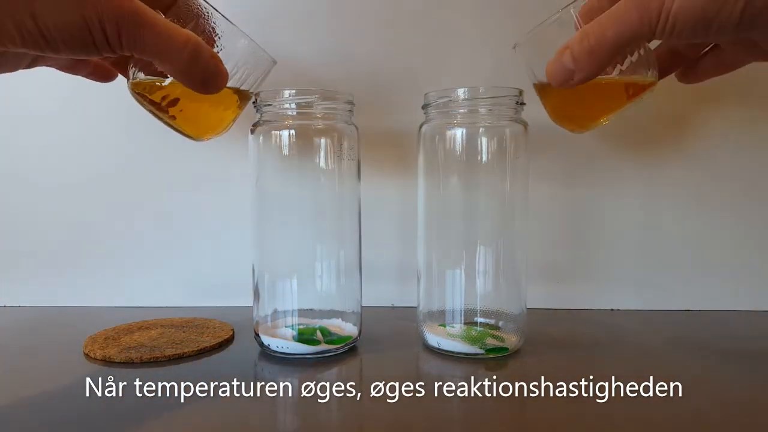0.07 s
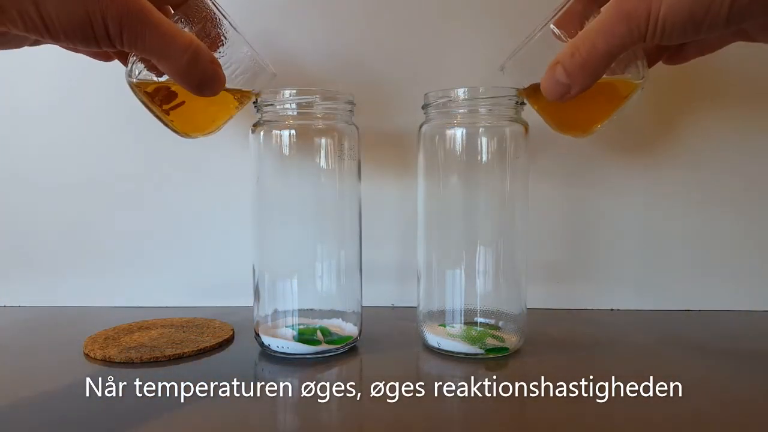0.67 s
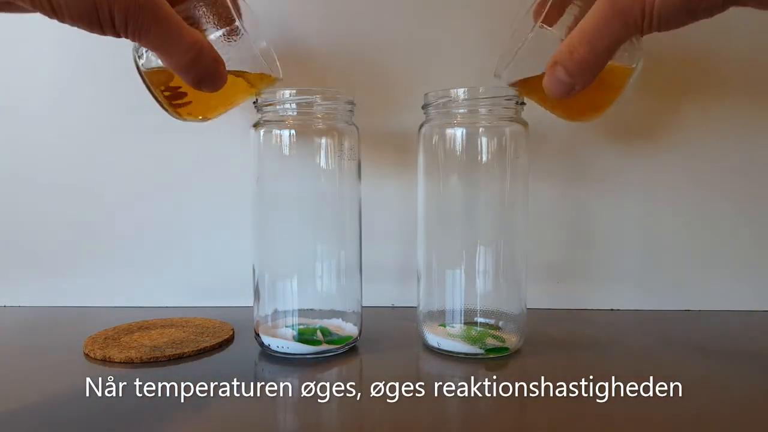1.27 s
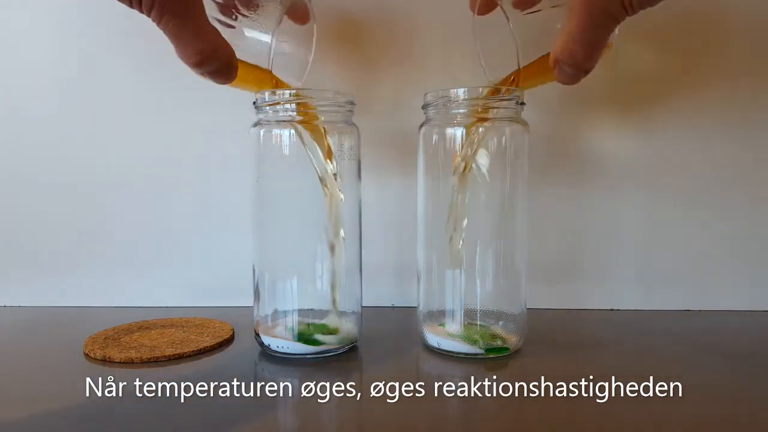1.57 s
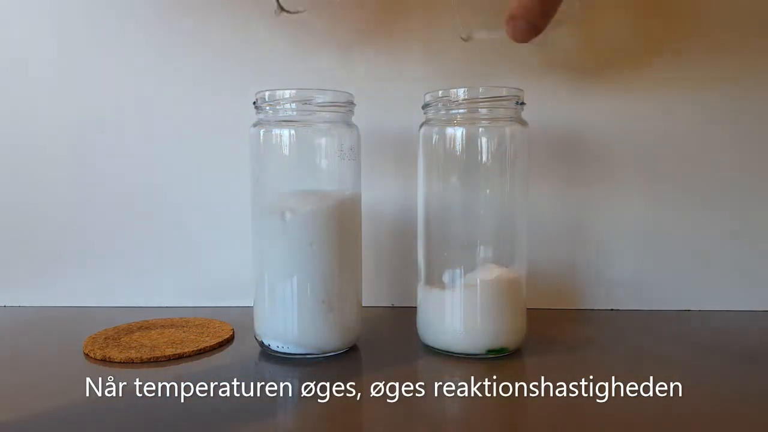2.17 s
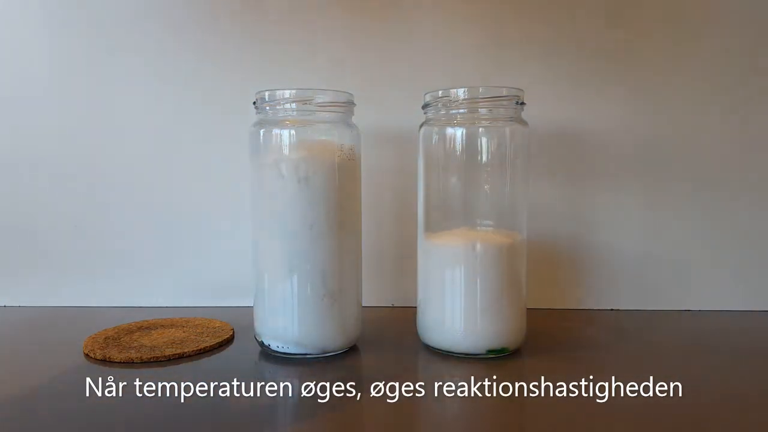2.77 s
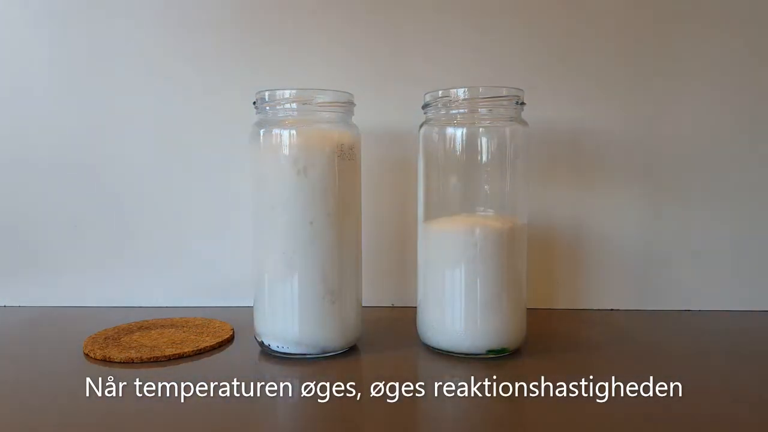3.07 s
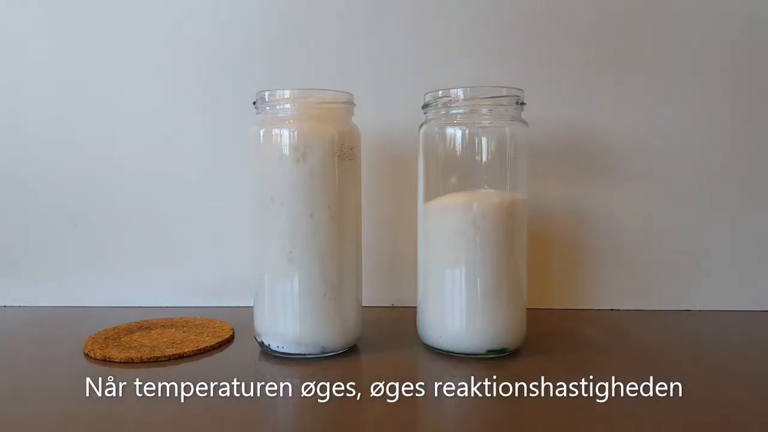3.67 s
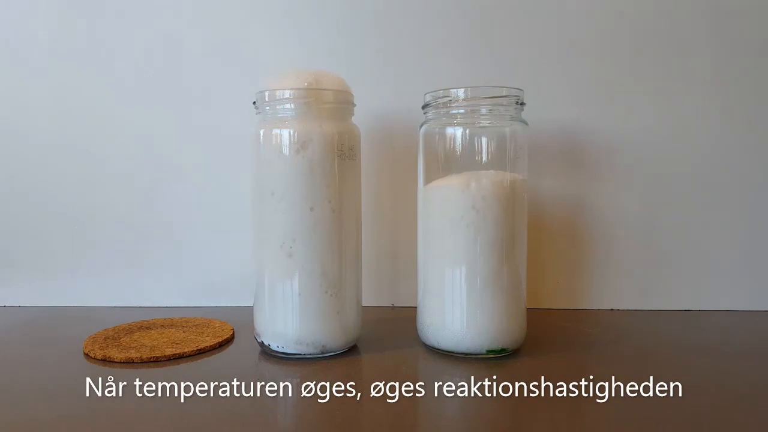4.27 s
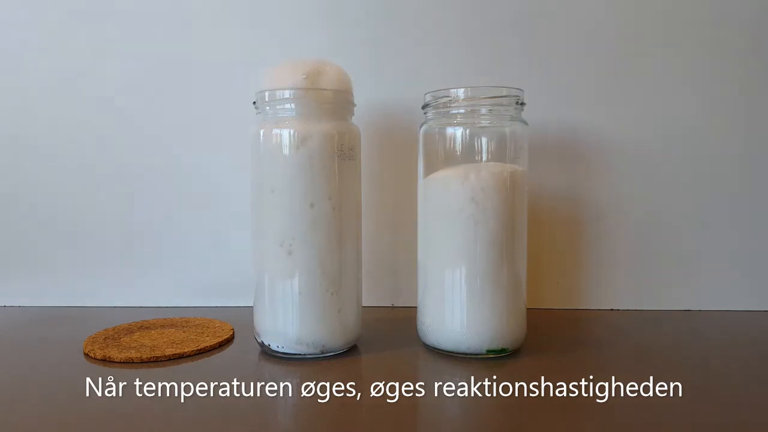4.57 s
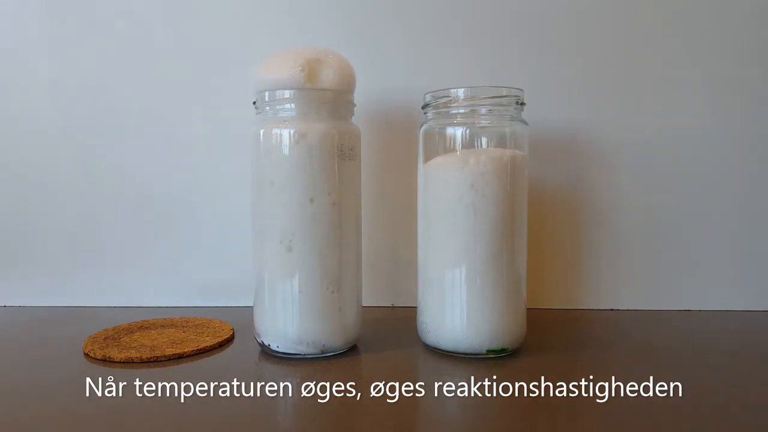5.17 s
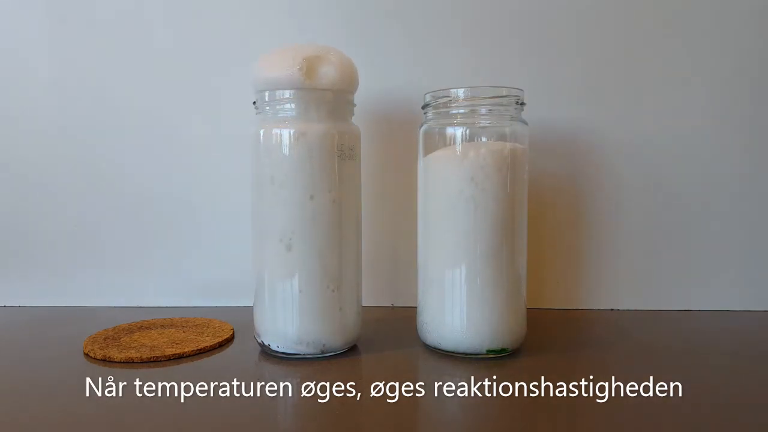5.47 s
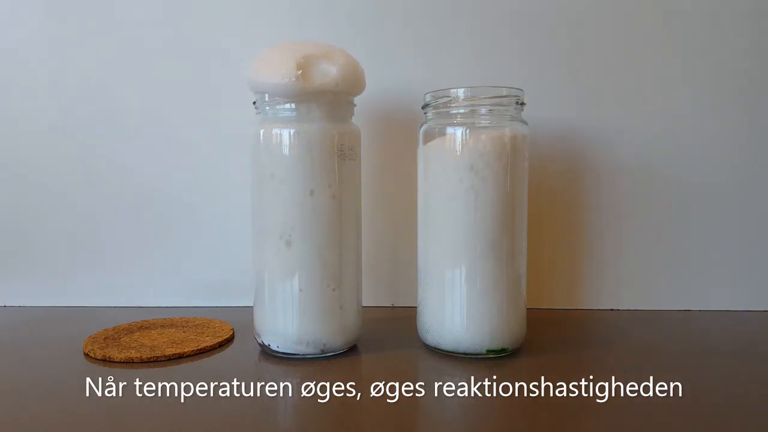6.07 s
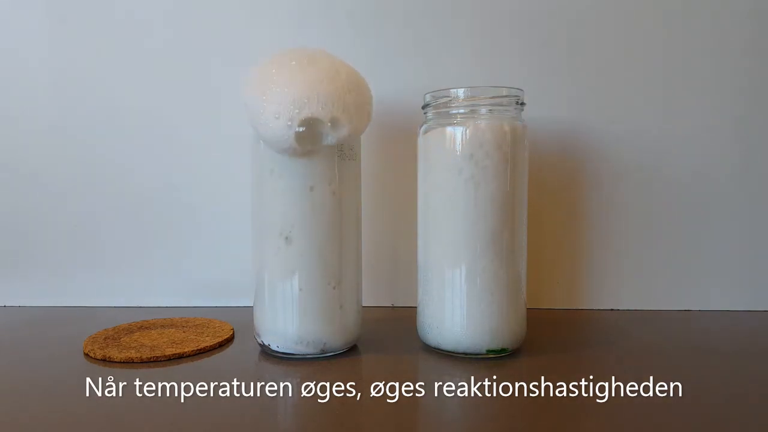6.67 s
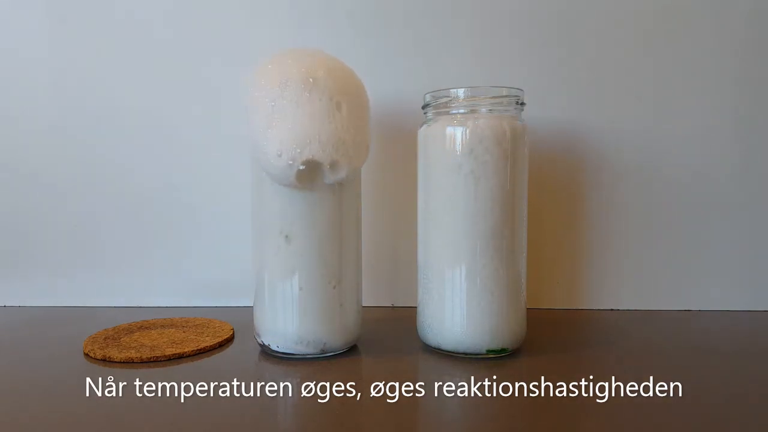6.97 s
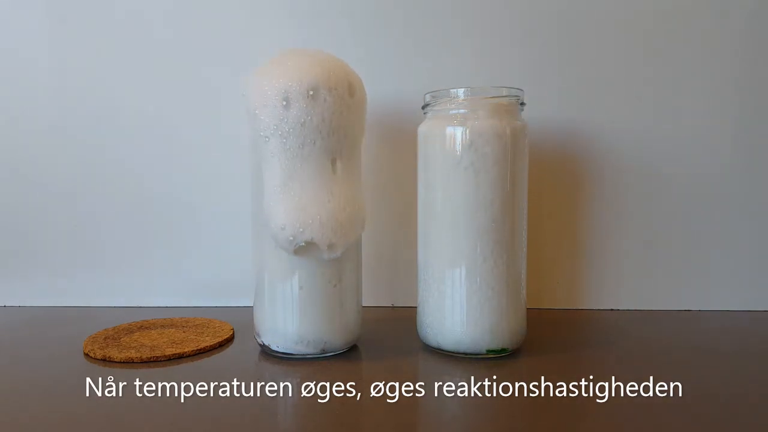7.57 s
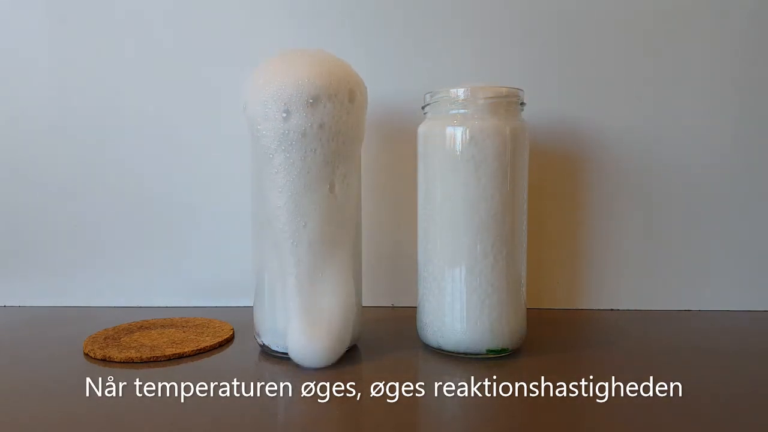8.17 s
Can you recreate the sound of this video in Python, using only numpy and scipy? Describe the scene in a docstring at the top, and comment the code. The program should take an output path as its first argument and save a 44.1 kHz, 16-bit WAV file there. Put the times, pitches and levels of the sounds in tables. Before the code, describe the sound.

Heard close in a quiet, slightly echoing room, glass taps on glass four times, the first the loudest. After a short pause, liquid dribbles into two jars and then rushes in all at once, splashing, knocking against the glass and ending in a run of hollow gulps. Foam spits and hisses, then dies down to a very soft fizz of bursting bubbles that lasts to the end.

```python
"""Two small glasses are emptied onto powder in two tall jars, heard close in a quiet, fairly live room.
First the glasses clink on the rims, and each impact sets the glass ringing in its natural modes.
Thin streams then trickle in and excite the air in the jars. The full pour follows, splashing and
trapping air that oscillates in chirps and gulps. Last, foam shoots up with a hiss of bursting
bubbles and settles to a faint fizz as the reaction slows."""
import sys
import numpy as np
from scipy import signal
from scipy.fft import rfft, irfft, next_fast_len
from scipy.io import wavfile

SR = 44100
rng = np.random.default_rng(int(sys.argv[2]) if len(sys.argv) > 2 else 0)


def wrap_up_sound(samples):
    """Save the sound to the file named by the first command line argument, as 16-bit audio."""
    columns = np.atleast_2d(samples).T
    # keep every value between -1 and 1, then stretch to whole-number steps
    tamed = np.clip(columns, -1, 1)
    steps = np.round(tamed * 32767).astype(np.int16)
    wavfile.write(sys.argv[1], SR, steps)


N = 366471
T = np.arange(N) / SR

# Spectra of the room's air, its hiss and its reflections: frequency_hz, relative_density_db
AIR_SPECTRUM = [(12, -28), (20, 1.5), (22, -11.5), (27, -13), (91, -1), (119, -11.5), (145, -8.5),
                (195, -8), (318, -14), (435, -12), (512, -16), (700, -20.5), (910, -47), (1540, -120)]
HISS_SPECTRUM = [(400, -7.5), (700, 0.5), (1200, 0.5), (2000, -2), (4000, -7), (7000, -12), (10800, -14),
                 (13500, -10.5), (16000, -11)]
WALL_SPECTRUM = [(100, -5.0), (300, -3.5), (550, 3), (1500, -5.5), (4000, -0.5), (12000, -1.5)]
# Reverberation time: frequency_hz, t60_s
REVERB_TIMES = [(150, 0.89), (500, 0.23), (1500, .45), (4000, 0.36), (12000, 0.27)]
# Left-right correlation of background, near sounds and impacts: frequency_hz, correlation
AIR_COHERENCE = [(60, -0.077), (180, 0.2615), (550, 0.11), (1650, -0.02), (4970, -0.1), (15000, -0.094)]
NEAR_COHERENCE = [(200, 0.95), (600, 0.78), (1200, 0.21), (3000, 0.26), (12000, .1)]
KNOCK_COHERENCE = [(200, 1), (550, 0.68), (1000, .5), (3000, 0.092)]

# A glass touches a rim: start_s, left_ring_db, right_ring_db, knock_db
RIM_CLINKS = [(0.13, -25, -44.5, -27), (.298, -58, -49.5, -47.5), (0.4428, -46.5, -33, -40),
              (0.6687, -53.5, -32, -39)]
# Liquid slaps a jar: start_s, right_ring_db, knock_db
LIQUID_SLAPS = [(1.309, -74, -56), (1.537, -67.5, -52), (1.636, -53, -46.5), (1.6785, -42, -39),
                (1.76, -44, -44)]
# Modes of each glass with its jar: pitch_hz, level_db, t60_s, left_over_right_db
LEFT_GLASS_MODES = [(553, -6, 0.18, -2), (818, -7, .2, -0.5), (1430, -17, 0.4, 0.5), (1950, -20, .22, 1.5),
                    (2790, 0, .33, 6), (2862, -4, .25, 0), (4514, 2, .11, -10), (4556, -2, .1, -5),
                    (4610, -7, .18, 0), (4982, -16, .26, 0), (4020, -20.5, .25, -9.5),
                    (4050, -16.5, .18, -2), (7250, -14, .09, 8.5), (7365, -13, .09, 9.5),
                    (9000, -18.5, 0.11, 16), (10480, -19.5, 0.14, 13.5), (12200, -24, 0.16, 3.5)]
RIGHT_GLASS_MODES = [(1013, -13.5, 0.17, 2.5), (1380, -25.5, 0.14, 0.5), (1726, -22, 0.22, 0.5),
                     (2200, -18.5, 0.099, -0.5), (2738, -14, .12, -1), (2778, 0, .28, 0),
                     (2806, -2, .28, -6), (3852, -12, .15, -4), (3908, -15, .14, -4),
                     (4530, -23.5, 0.21, -0.5), (4590, -18, 0.17, 0), (7000, -27.5, .15, 0),
                     (8700, -29, .15, -2.5), (10740, -32, .13, -6.5), (12325, -29.5, .13, 8.5)]
# Dull knock of jar and table, and tick of the contact: frequency_hz, relative_density_db
KNOCK_SPECTRUM = [(70, -25), (140, -12), (250, -3.5), (345, -14.5), (450, -3), (570, -1.5), (690, -13.5),
                  (800, 1.5), (950, -2), (1250, -8.5), (2700, -12.5), (3500, -23), (4700, -17.5),
                  (6000, -38), (15000, -55.5)]
TICK_SPECTRUM = [(500, -14), (2500, 0.5), (5000, 0), (6200, -4.5), (7400, -2), (11000, -6.5), (16000, -17)]

# Air modes of the empty jars, filled jars and space above the foam: pitch_hz, width_hz, relative_db
EMPTY_JAR_MODES = [(150, 69, -6.5), (254, 120, -8), (503, 81, -0.5), (854, 120, -7), (1750, 370, -18.5),
                   (2840, 84, -16), (3750, 160, -15), (4450, 250, -26), (6900, 520, -23),
                   (9100, 830, -26.5), (12900, 2300, -26.5)]
FILLED_JAR_MODES = [(1615, 64, -4.5), (2764, 70, 2.5), (3960, 200, -12.5)]
HEADSPACE_MODES = [(503, 35, -2.5), (1624, 70, 0), (4070, 30, -3.5), (7300, 150, -18), (12600, 780, -20)]
# Small bubbles in the splash, and large soft ones: start_s, pitch_hz, peak_db
BUBBLE_CHIRPS = [(1.678, 3610, -35.5), (1.758, 3980, -38.5), (1.772, 4910, -41), (1.864, 3950, -40),
                 (1.884, 4204, -44), (1.955, 1649, -41)]
BUBBLE_PLOPS = [(1.762, 347, -39), (2.07, 253.5, -39), (3.267, 202.5, -65.5), (5.002, 190, -69),
                (7.489, 195, -61.5)]
# The air above the foam gulps: start_s, peak_db, swell_s
AIR_GULPS = [(1.9656, -17, .0052), (1.993, -32.5, .0045), (2.009, -26, .006), (2.021, -28, 0.011),
             (2.062, -39.5, 0.0082), (2.092, -40.5, 0.0072), (2.131, -41.5, .008), (2.176, -50.5, 0.015),
             (2.233, -58.5, 0.0076)]
# Soft gurgles in the foam: start_s, level_db, swell_s, pitch_hz, width_hz
FOAM_GURGLES = [(3.25, -75, 0.22, 445, 90), (7.62, -75.5, 0.095, 1120, 250)]

# Spectra of foam, pool, splash and spray: frequency_hz, relative_density_db
FIZZ_SPECTRUM = [(600, -7.5), (1500, 1.5), (4000, 2.5), (5500, -2.5), (8000, 1.5), (11000, -3.5),
                 (13000, -4.5), (16000, -3)]
CHURN_SPECTRUM = [(50, -25), (110, -16.5), (160, -13), (260, -3.5), (340, -2.5), (400, -7), (540, -2),
                  (700, -11), (920, -11), (1300, -19.5), (2500, -38)]
SPLASH_SPECTRUM = [(600, -15), (900, -3.5), (1300, -9.5), (1570, -1), (2000, -9.5), (2600, 2.5),
                   (3300, -2.5), (4000, -2), (5200, -3.5), (7000, -15.5), (10000, -35)]
SPRAY_SPECTRUM = [(2940, -29), (5000, -16.5), (5350, -5.5), (5780, 0.5), (6740, -7.5), (9040, 4),
                  (11200, -9), (14400, -11), (15800, -19)]
# A slug of liquid lands: start_s, churn_db, splash_db
LIQUID_SURGES = [(1.68, -61, -53.5), (1.761, -42, -46.5), (1.955, -42, -58.5)]
# Bursts of spray and foam: start_s, level_db, swell_s
FOAM_SPITS = [(1.788, -34.5, 0.0075), (1.841, -42, 0.0033), (1.922, -40.5, 0.0079), (1.973, -48, .002),
              (2.136, -46.5, 0.004), (2.834, -64, 0.024), (3.40, -71, 0.017)]

TRICKLE_START_S, POUR_START_S, POUR_FULL_S, POUR_END_S = 1.32, 1.68, 1.765, 1.945


def from_db(db):
    """Amplitude grows tenfold for every 20 dB."""
    return 10 ** (np.asarray(db) / 20)


def unit_rms(x):
    """Normalisation to unit mean power."""
    return x / np.sqrt(np.mean(x ** 2) + 1e-20)


def at_hz(points, hz):
    """Interpolation on a logarithmic frequency axis."""
    points = np.array(points)
    return np.interp(np.log(np.maximum(hz, 1)), np.log(points[:, 0]), points[:, 1])


def pan(db):
    """Constant-power panning by a left-right level difference."""
    return unit_rms(from_db([[db / 2], [-db / 2]]))


def add(out, start_s, sound):
    """Superposition: a sound adds to the mix from its start time."""
    at = int(start_s * SR)
    out[:, at:at + sound.shape[-1]] += sound[..., :N - at]


def swell(t, rise_s):
    """A Rayleigh-shaped envelope reaches 1 at `rise_s` and dies soon after."""
    u = np.maximum(t, 0) / rise_s
    return u * np.exp((1 - u * u) / 2)


def hold(start_s, end_s, fall_db_per_s, rise_db_per_s=300):
    """Exponential growth to 1 at `start_s`, and exponential decay from `end_s`."""
    before, after = np.maximum(start_s - T, 0), np.maximum(T - end_s, 0)
    return from_db(-rise_db_per_s * before - fall_db_per_s * after) + 1e-12


def colour(pair, spectrum, coherence=NEAR_COHERENCE):
    """Mid-side filtering gives two independent signals a spectrum and a correlation; rms 1."""
    size = next_fast_len(pair.shape[1])
    hz = np.fft.rfftfreq(size, 1 / SR)
    alike = np.clip(at_hz(coherence, hz), -1, 1)
    mid, side = rfft(pair, size) * from_db(at_hz(spectrum, hz))
    stereo = np.sqrt(1 + alike) * mid + np.sqrt(1 - alike) * side * [[1], [-1]]
    return unit_rms(irfft(stereo, size)[:, :pair.shape[1]])


def grains(per_s, spread_db):
    """Shot noise: tiny collapses at random times, a few much larger than the rest."""
    sizes = from_db(spread_db * np.minimum(rng.exponential(1, N), 4))
    return unit_rms((rng.random(N) < per_s / SR) * sizes * rng.standard_normal((2, N)))


def resonate(x, hz, width_hz):
    """A damped resonator passes one band, with gain 1 at its peak."""
    r = np.exp(-np.pi * width_hz / SR)
    feedback = [1, -2 * r * np.cos(2 * np.pi * hz / SR), r * r]
    return signal.lfilter(np.array([1, 0, -1]) * (1 - r * r) / 2, feedback, x)


def air_modes(modes, pitch_ratio=1):
    """Narrow resonances under random excitation give wavering tones; rms 1."""
    out, warped_s = 0, np.cumsum(pitch_ratio * np.ones(N)) / SR
    for hz, width_hz, db in modes:
        r = np.exp(-2 * np.pi * .8 * width_hz / SR)
        in_phase, quadrature = signal.lfilter([1], [1, -2 * r, r * r], rng.random((2, 2, N)) - .5)
        phase = 2 * np.pi * hz * warped_s
        mid, side = unit_rms(in_phase * np.cos(phase) + quadrature * np.sin(phase))
        alike = np.clip(at_hz(NEAR_COHERENCE, hz), 0, 1)
        stereo = np.sqrt(1 + alike) * mid + np.sqrt(1 - alike) * side * [[1], [-1]]
        out = out + from_db(db) * np.sqrt(width_hz) * stereo
    return unit_rms(out)


def background():
    """Stationary noise: low room air, a broadband hiss and a narrowband whine."""
    air = colour(rng.standard_normal((2, N)), AIR_SPECTRUM, AIR_COHERENCE)
    hiss = colour(rng.standard_normal((2, N)), HISS_SPECTRUM, AIR_COHERENCE)
    whine = air_modes([(9470, 180, 0)])
    return from_db(-71) * (air + hiss) + from_db(-93) * whine


def reverberation(x):
    """Dense reflections arrive after 7 ms and decay exponentially, most slowly in the bass."""
    t, edges_hz = T[:SR * 3 // 4], np.geomspace(60, 16000, 9)
    tail = 0
    for low, high in zip(edges_hz, edges_hz[1:]):
        bandpass = signal.butter(2, [low, high], "band", fs=SR, output="sos")
        band = signal.sosfilt(bandpass, rng.standard_normal((2, len(t))))
        tail = tail + band * from_db(-60 * t / at_hz(REVERB_TIMES, np.sqrt(low * high)))
    onset = np.clip(t / .014 - .5, 0, 1)
    response = colour(tail * onset, WALL_SPECTRUM) / np.sqrt(len(t))
    return signal.fftconvolve(x, response, axes=1)[:, :N]


def foam(peak_s=2.2, build_s=.5, slowing_s=.4):
    """Bursting bubbles make shot noise that thins by a power law; resonant bands of it gurgle."""
    build = np.clip(1 + (T - peak_s) / build_s, 0, 1)
    vigour = build * (1 + np.maximum(T - peak_s, 0) / slowing_s) ** -.62
    out = from_db(-73.5) * vigour * colour(grains(10000 * vigour, 2.5), FIZZ_SPECTRUM)
    for start_s, db, rise_s, hz, width_hz in FOAM_GURGLES:
        gurgle = unit_rms(resonate(grains(800, 1.5), hz, width_hz))
        out += from_db(db) * swell(T - start_s, rise_s) * gurgle
    return out


def glass_ring(modes, tilt_db_per_octave, t):
    """Free vibration of struck glass: close pairs of damped modes beat as they decay."""
    out = 0
    for hz, db, t60_s, side_db in modes:
        gain = from_db(db + tilt_db_per_octave * np.log2(hz / 2800)) * pan(side_db)
        out = out + gain * from_db(-60 * t / t60_s) * np.sin(2 * np.pi * hz * t)
    return out


def impacts():
    """Impulsive excitation: glass or liquid gives a tick, a knock and a ring, brighter when harder."""
    rings, knocks, t = np.zeros((2, N)), np.zeros((2, N)), T[:SR // 2]
    t_left = np.maximum(t - [[0], [.00005]], 0)   # the left jar reaches the right ear later
    clinks = [(*clink, -31) for clink in RIM_CLINKS]
    slaps = [(start_s, db - 6.5, db, knock_db, -48) for start_s, db, knock_db in LIQUID_SLAPS]
    for start_s, left_db, right_db, knock_db, bright_above_db in clinks + slaps:
        tilt = .39 * (knock_db - bright_above_db)   # dB per octave
        left = from_db(left_db) * glass_ring(LEFT_GLASS_MODES, tilt, t_left)
        right = from_db(right_db) * glass_ring(RIGHT_GLASS_MODES, tilt, t)
        add(rings, start_s, (left + right) * (1 - np.exp(-t / .0018)))
        knock = colour(rng.standard_normal((2, len(t))), KNOCK_SPECTRUM, KNOCK_COHERENCE)
        knock *= .94 * np.exp(-t / .015) + .52 * swell(t - .004, .008)   # builds through jar and table
        tick = colour(rng.standard_normal((2, len(t))), TICK_SPECTRUM, KNOCK_COHERENCE)
        tick *= np.exp(-t / .0044) + .062 * np.exp(-t / .023)
        add(knocks, start_s, from_db(knock_db) * (knock + from_db(-7.5 + .99 * tilt) * tick))
    return rings, knocks


def trickle(growth_db_per_s=15):
    """Cavity resonance: thin, uneven streams excite the air in the empty jars, the treble less."""
    steps_s = np.linspace(0, T[-1], 400)
    stutter = unit_rms(from_db(3.5 * np.interp(T, steps_s, rng.standard_normal(len(steps_s)))))
    level_db = -59 + growth_db_per_s * (np.minimum(T, POUR_START_S) - TRICKLE_START_S)
    running = hold(TRICKLE_START_S, POUR_START_S, fall_db_per_s=170, rise_db_per_s=700)
    air = signal.lfilter(*signal.butter(1, 4500, fs=SR), air_modes(EMPTY_JAR_MODES))
    return from_db(level_db) * running * stutter * air


def gas_filled_jars(flow, sag_octaves_per_s=.6, sag_s=.2):
    """Cavity modes follow the speed of sound: gas fills the jars and lowers their pitch."""
    pitch_ratio = 2 ** (-sag_octaves_per_s * np.clip(T - POUR_FULL_S, 0, sag_s))
    return from_db(-49.5) * flow ** 1.4 * air_modes(FILLED_JAR_MODES, pitch_ratio)


def headspace(climb_end_s=2.42):
    """The cavity above the foam resonates as the pour ends, then faintly while the foam climbs."""
    after_pour = from_db(-52) * hold(POUR_END_S, POUR_END_S, fall_db_per_s=125)
    climb = from_db(-75) * hold(POUR_END_S, climb_end_s, fall_db_per_s=25.5)
    return (after_pour + climb) * air_modes(HEADSPACE_MODES)


def air_pocket(hz, db, rise_s, octaves_per_s, side_db):
    """Enclosed air acts as a spring and oscillates in a short, gliding tone."""
    t = T[:SR // 10]
    phase = 2 * np.pi * np.cumsum(hz * 2 ** (octaves_per_s * t)) / SR
    return from_db(db) * pan(side_db) * swell(t, rise_s) * np.sin(phase)


def trapped_air():
    """Air pockets resonate, the larger the lower: plinks under the slaps, chirps, gulps and plops."""
    out = np.zeros((2, N))
    for start_s, _, knock_db in LIQUID_SLAPS:
        hz = 893 * rng.uniform(.81, 1.2)
        add(out, start_s, air_pocket(hz, knock_db + 4.5, rise_s=.0034, octaves_per_s=1.5, side_db=-4))
    for start_s, hz, db in BUBBLE_CHIRPS:
        add(out, start_s, air_pocket(hz, db, rise_s=.0049, octaves_per_s=2.5, side_db=-1))
    for start_s, db, rise_s in AIR_GULPS:
        add(out, start_s, air_pocket(506, db, rise_s, octaves_per_s=.3, side_db=-4))
    for start_s, hz, db in BUBBLE_PLOPS:
        add(out, start_s, air_pocket(hz, db, rise_s=3.2 / hz, octaves_per_s=-4.5, side_db=-1.5))
    return out


def bubble_cloud(low_hz, high_hz, decay_cycles, count, start_s=1.6, span_s=.6):
    """Entrained bubbles ring as damped oscillators and rise in pitch; rms 1 while they last."""
    out, t = np.zeros((2, N)), T[:SR // 25]
    for when, height, softness, side, rise in rng.random((count, 5)):
        hz = low_hz * (high_hz / low_hz) ** height
        age = t * hz / decay_cycles
        chirp = np.sin(2 * np.pi * hz * t * (1 + .039 * rise * np.minimum(age, 5)))
        gain = from_db(-14 * softness) * pan(16 * (side - .5))
        add(out, start_s + when * span_s, gain * np.exp(-age) * chirp)
    return unit_rms(out) * np.sqrt(span_s / T[-1])


def pour(flow, surge_decay_s=.035):
    """Impact and air entrainment: the streams churn the pool, splash on the glass and throw spray."""
    churn = from_db(-49) * hold(POUR_FULL_S, POUR_END_S, fall_db_per_s=57, rise_db_per_s=129)
    splash = from_db(-53) * flow
    for start_s, churn_db, splash_db in LIQUID_SURGES:
        surge = (T >= start_s) * np.exp(-np.abs(T - start_s) / surge_decay_s)
        churn += from_db(churn_db) * surge
        splash += from_db(splash_db) * surge
    spray = from_db(-56) * flow
    spray += from_db(-55) * swell(T - POUR_FULL_S, .058)   # the soaked powder foams
    spray += from_db(-69) * hold(POUR_END_S, POUR_END_S, fall_db_per_s=35)   # fresh foam spits on
    spits = sum(from_db(db) * swell(T - start_s, rise_s) for start_s, db, rise_s in FOAM_SPITS)
    out = churn * colour(grains(1200, 1.3), CHURN_SPECTRUM)
    bubbles = bubble_cloud(low_hz=1500, high_hz=5400, decay_cycles=18, count=170)
    mist = bubble_cloud(low_hz=5500, high_hz=14000, decay_cycles=30, count=350)
    out += splash * (colour(grains(3000, 5.6), SPLASH_SPECTRUM) + .95 * bubbles)
    out += spray * (colour(grains(9000, 1.8), SPRAY_SPECTRUM) + .5 * mist)
    return out + spits * colour(grains(16000, 1.5), FIZZ_SPECTRUM)


def scene():
    """Direct sound and reverberation superpose on the fizz and the background."""
    rings, knocks = impacts()
    flow = hold(POUR_START_S, POUR_END_S, fall_db_per_s=150.5)   # strength of the full streams
    liquid = pour(flow) + trickle() + gas_filled_jars(flow) + headspace()
    pockets = trapped_air()
    to_room = from_db(-15.5) * rings + from_db(-8) * knocks
    to_room += from_db(-12.5) * liquid + from_db(-17.5) * pockets
    return rings + knocks + liquid + pockets + reverberation(to_room) + foam() + background()


def record(dry):
    """Band limiting: a steep low-pass filter cuts the treble above 15.8 kHz."""
    return signal.sosfilt(signal.ellip(12, .1, 70, 15800, fs=SR, output="sos"), dry)


dry = scene()
out = record(dry)
wrap_up_sound(out)
```